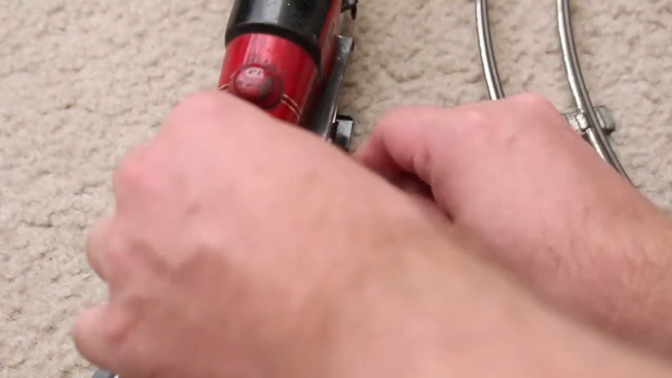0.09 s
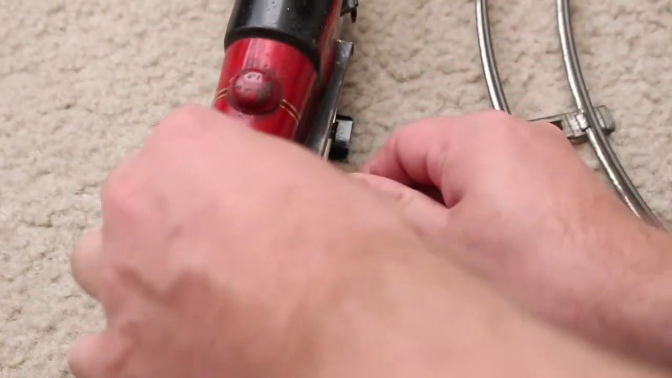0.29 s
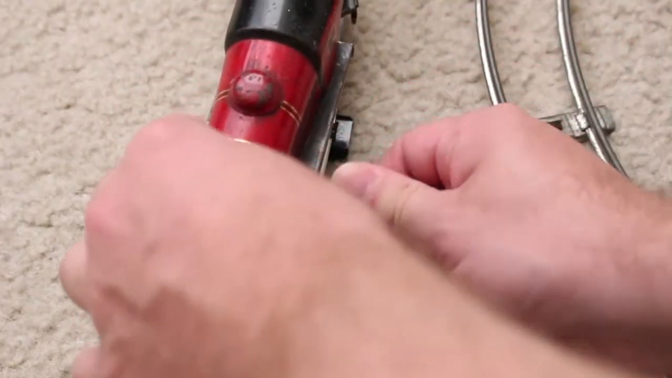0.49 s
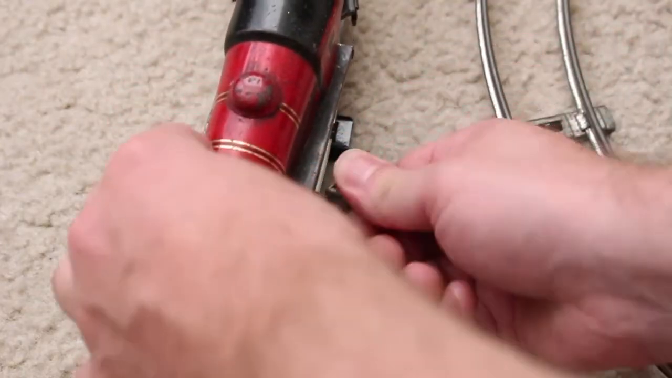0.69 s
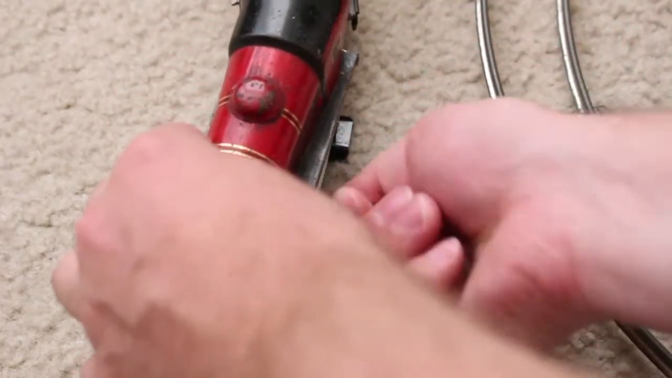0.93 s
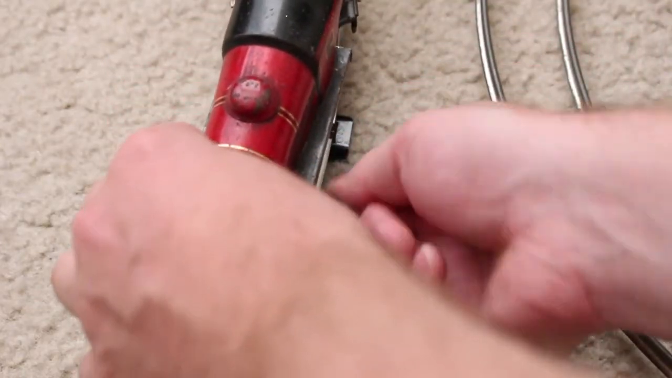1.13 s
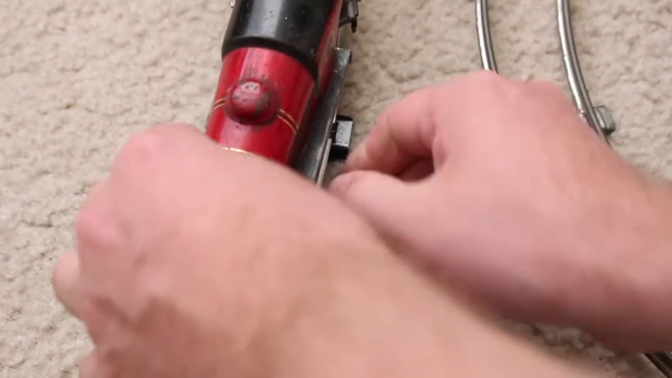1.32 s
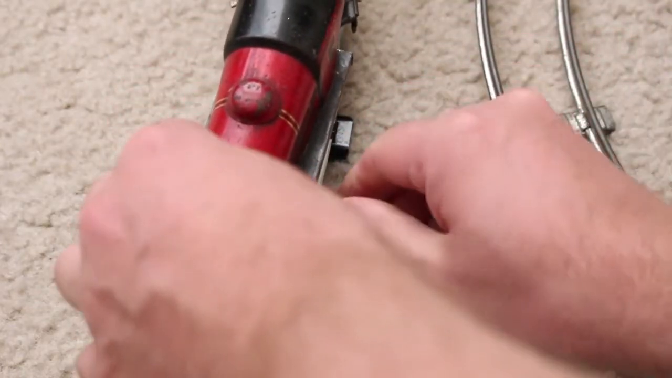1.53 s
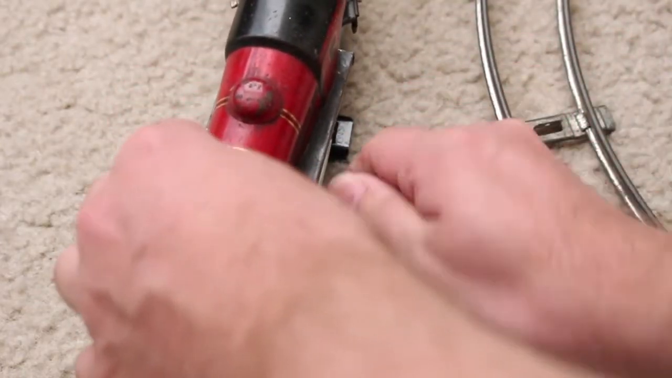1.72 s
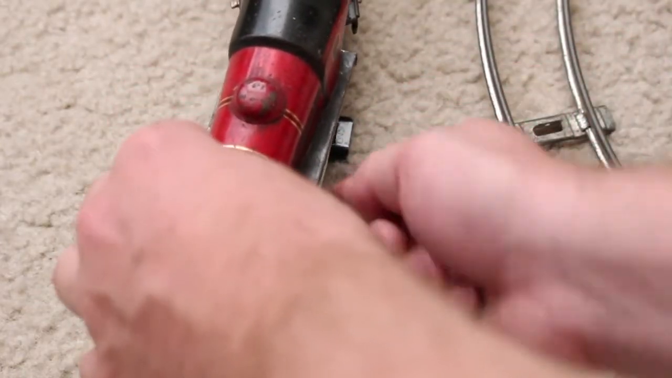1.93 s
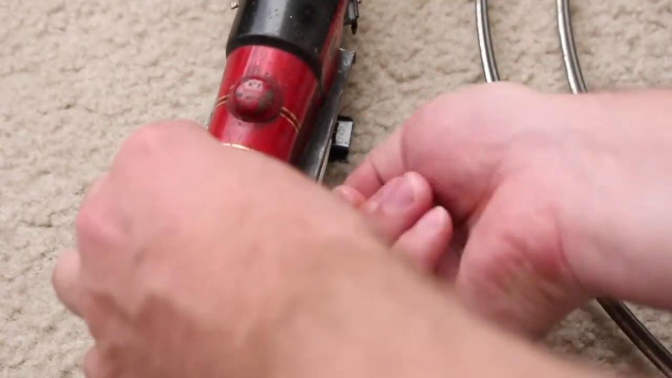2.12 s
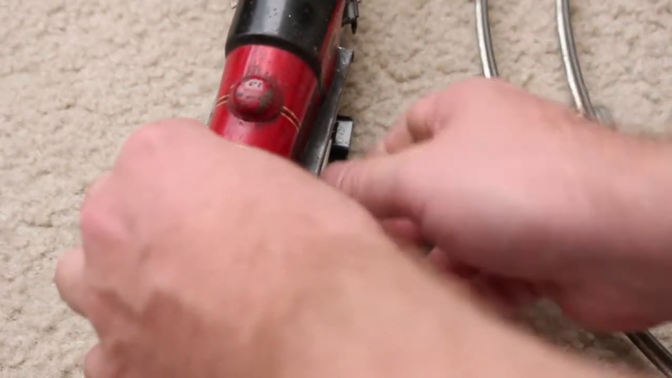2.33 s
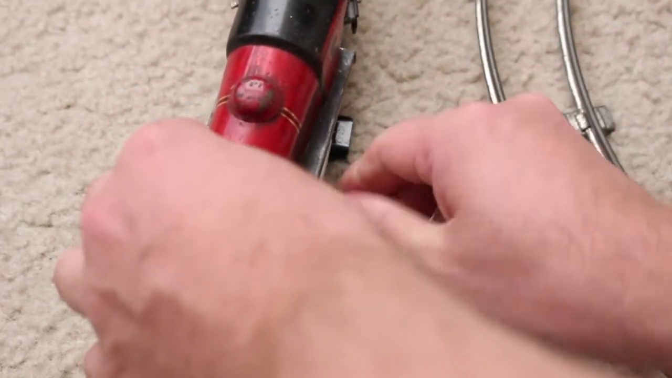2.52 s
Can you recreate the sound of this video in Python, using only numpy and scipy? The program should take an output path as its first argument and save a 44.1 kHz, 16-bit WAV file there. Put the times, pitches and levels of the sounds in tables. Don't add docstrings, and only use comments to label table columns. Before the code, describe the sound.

A clockwork toy locomotive is wound by key, its ratchet snapping in two uneven metallic bursts

```python
import sys
import numpy as np
from scipy import signal
from scipy.fft import rfft, irfft
from scipy.io import wavfile

SR = 44100
rng = np.random.default_rng(int(sys.argv[2]) if len(sys.argv) > 2 else 0)


def wav_record(signal):
    frames = np.transpose(np.atleast_2d(signal))
    bounded = np.clip(frames, -1, 1)
    quanta = np.round(bounded * 32767).astype(np.int16)
    wavfile.write(sys.argv[1], SR, quanta)


def voltage_ratio(level):
    return 10 ** (np.asarray(level, float) / 20)


N = 112455

# (time [s], peak level [dB], gear brightness [dB], strongest ring [Hz], second ring [Hz])
PAWL_SNAPS = [(0.2109, -13.5, -1, 1580, 2130), (0.5954, -14.5, -0.5, 2235, 1350),
              (0.7847, -21.5, 0.5, 2145, 3615), (0.9137, -17, -2.5, 1560, 1594),
              (0.987, -23.5, 1.5, 2090, 1520), (1.464, -33.5, -2.5, 920, 1490),
              (1.829, -18.5, -1.5, 2145, 1645), (1.9181, -22, -2.2, 1382, 1256),
              (1.998, -33, -6, 2145, 1860), (2.006, -19.5, -1, 2070, 1290), (2.092, -16, -6.5, 1557, 1787)]
SNAP_SIZZLE_DB = [1.5, 0.8, -1.5, 0.1, 1.7, 2.5, -2.7, 2.7, -20, -2, 7]
# (time [s], peak level [dB], gear brightness [dB], strongest ring [Hz], second ring [Hz])
KEY_KNOCKS = [(0.001, -34, -6, 2110, 3080), (0.017, -39, -7, 1380, 2060), (0.0515, -35, -12, 2210, 3130),
              (1.015, -27, -9, 1650, 1360), (1.024, -35, -0.5, 2110, 1700), (1.107, -32.5, 0.5, 1480, 6280),
              (1.1511, -28.5, -4, 2246, 1680), (1.4229, -34, -14, 1750, 1300),
              (1.6888, -31, -4.5, 2150, 1620), (1.7162, -31.5, 1, 2220, 1660),
              (1.7732, -35.5, -5.5, 2160, 1750), (2.2242, -42, 2, 1850, 1490),
              (2.2293, -32, -1, 1580, 1760), (2.2695, -25.5, -3.5, 1590, 7880),
              (2.285, -27, -5, 1577, 2170), (2.303, -34.5, -5, 2550, 1580),
              (2.5025, -46.5, 1.5, 1300, 2100), (2.5075, -33.5, -2.5, 1300, 1850)]
# (time [s], peak level [dB], gear brightness [dB],
# strongest ring [Hz], second ring [Hz])
TAPS_AND_REBOUNDS = [(0.1478, -38.5, -1, 365, 1300), (0.2123, -12, 2.5, 2020, 1505), (0.218, -15, -6, 1546, 1690),
                     (0.5921, -20, -2, 1360, 1660), (0.5965, -19, -1, 2282, 1964), (0.6612, -29.5, 2, 1520, 1650),
                     (0.6672, -35, -8.5, 1640, 1710), (0.7849, -21, 2, 3640, 3454),
                     (0.8132, -35.5, -6.5, 3580, 2440), (0.8879, -42, -9.5, 1545, 1400),
                     (0.9122, -24, -9.5, 1650, 1260), (0.9472, -36, -6.5, 1585, 1700),
                     (0.9772, -29.5, -6.5, 2230, 1460), (1.1024, -40, 8, 1710, 2780), (1.1235, -35, 0, 1735, 2100),
                     (1.1531, -34.5, 1, 2110, 2900), (1.2456, -40, -5, 1260, 1600), (1.3152, -45, -12, 905, 1610),
                     (1.4272, -40, -12.5, 525, 905), (1.4342, -41, -9.5, 1610, 905), (1.4647, -35, -4, 884, 517),
                     (1.4716, -40, -6, 760, 2470), (1.4782, -39, 6, 5800, 2490), (1.7123, -39, 2.5, 2130, 2500),
                     (1.7744, -41, 1, 2160, 3010), (1.8362, -26.5, -1, 1655, 2190),
                     (1.9252, -34, -3.5, 1610, 1740), (2.0946, -20.5, 5, 1420, 1630), (2.1006, -27, 9, 1565, 1740),
                     (2.171, -34, 4, 1740, 1320), (2.1782, -35, -14, 1680, 1575), (2.2129, -35, 0, 1690, 2200),
                     (2.373, -43, -7.5, 1550, 1840), (2.384, -39, -17, 1700, 1480)]
# (start [s], length [s], level [dB])
KEY_RUBS = [(0.015, 0.056, -75.5), (0.187, 0.03, -62.5), (0.584, 0.0085, -61), (0.695, 0.08, -71.5),
            (0.875, 0.029, -74), (0.939, 0.085, -65.5), (1.064, 0.11, -71), (1.239, 0.09, -72),
            (1.707, 0.055, -75.5), (2.12, 0.053, -78), (2.262, 0.095, -73.5)]
# (frequency [Hz], level [dB], T60 [s])
SHELL_MODES = [(1160, -38, 0.09), (1235, -7, 0.021), (1320, -14.5, 0.072), (1386, -13, 0.045),
               (1490, -23.5, 0.045), (1589, -13.5, 0.05), (1634, -18, 0.15), (1707, -8.5, 0.051),
               (1850, -8.5, 0.03), (2070, 2, 0.0069), (2145, -17, 0.11), (2215, 3, 0.035),
               (2465, -6.5, 0.042), (2685, -11.5, 0.022)]
# (frequency [Hz], level [dB], T60 [s])
HOLLOW_MODES = [(343, -42, 0.0048), (462, -18, 0.025), (640.4, -13, 0.025), (907, -15, 0.017),
                (1070, -16.5, 0.015)]
# (frequency [Hz], level [dB], T60 [s])
GEAR_MODES = [(3000, -4, 0.021), (3267, 1.5, 0.0091), (3400, -10, .04), (3615, -6, 0.056),
              (4200, -19, 0.033), (4920, -21, 0.013), (5070, -16, 0.09), (5310, -9, 0.09),
              (6280, -19, 0.026), (7760, -5.5, 0.03), (7440, -30.5, 0.028), (8300, -9, 0.0057),
              (9160, -38, 0.01), (11000, -36, 0.015)]
# (frequency [Hz], level [dB], T60 [s])
DOME_MODES = [(1520, -21.5, 0.3), (1560, -16.5, 0.3), (1592, -21, 0.3), (1690, -21, 0.19)]
# (frequency [Hz], density [dB per Hz])
RATTLE_SPECTRUM = [(1500, -7), (2600, -6), (4000, 1.5), (6000, 1.5), (8000, 2), (9500, -2.5), (16000, -13)]
# (frequency [Hz], density [dB per Hz])
SIZZLE_SPECTRUM = [(7000, -20), (9000, -1), (12000, -0.5), (14500, -4), (16000, -16)]
# (time [s], length [s], level [dB], frequency [Hz])
HAND_PRESSES = [
    (0.71, 0.061, -62, 71),
    (1.12, 0.097, -66, 66),
    (1.795, 0.13, -58, 82.4),
    (2.256, 0.11, -67, 72.3),
]
# (frequency [Hz], density [dB per Hz])
HUSH_SPECTRUM = [(20, -0.5), (70, 7.5), (110, 5.5), (190, 4.5), (600, 1), (2000, -2), (9000, -11),
                 (16500, -18.5)]
# (frequency [Hz], width [Hz], level [dB])
HUMS = [
    (86.2, 9, -76.5),
    (189, 42, -69),
]
# (frequency [Hz], left-right likeness [-1..1])
HUSH_LIKENESS = [(60, -0.28), (130, -0.46), (290, 0.068), (640, -0.27), (1410, -0.18), (3100, -0.25),
                 (6820, 0.15), (15000, -0.33)]

FAVOUR_OCTAVES = 0.07


def rms_one(x):
    return x / np.sqrt(np.mean(x ** 2) + 1e-20)


def shaped(x, points):
    hz, db = np.transpose(points)
    f = np.maximum(np.arange(N // 2 + 1) * SR / N, 1)
    return irfft(rfft(x) * voltage_ratio(np.interp(np.log(f), np.log(hz), db)), N)


def pan(db):
    return voltage_ratio(db * np.array([[-.5], [.5]]))


def toy_highpass(x, order):
    return signal.sosfilt(signal.butter(order, 405, "high", fs=SR, output="sos"), x)


def nearness(hz, centre_hz, octaves):
    return np.exp(-(np.log2(hz / centre_hz) / octaves) ** 2)


def energy_envelope(kicks, t60):
    return np.sqrt(signal.lfilter([1], [1, -voltage_ratio(-120 / (t60 * SR))], kicks + 1e-18))


def contacts():
    rows = np.array([*PAWL_SNAPS, *KEY_KNOCKS, *TAPS_AND_REBOUNDS])
    counts = [len(PAWL_SNAPS), len(KEY_KNOCKS), len(TAPS_AND_REBOUNDS)]
    kind = np.repeat(np.arange(3), counts)[:, None]
    loss_db = np.array([4.5, 3, 37])[kind]
    sizzle_db = np.r_[SNAP_SIZZLE_DB, np.full(counts[1] + counts[2], -29)][:, None]
    jitter = rng.uniform(-.3, .3, (len(rows), 6))
    step = np.arange(-1, 5)
    bounce_s, tick_lead_s, tick_db = 0.004, 0.0015, -15
    bouncing = step > 0
    s = rows[:, :1] + np.where(step < 0, -tick_lead_s, bounce_s * (step + jitter * bouncing))
    tick = tick_db - loss_db * (kind > 0)
    landing = -loss_db * step + 6 * jitter * bouncing
    db = rows[:, 1:2] - 10 * (kind == 2) + np.where(step < 0, tick, landing)
    at = (np.maximum(s, 0) * SR).astype(int)
    return at, step, db, rows[:, 2:3], sizzle_db, rows[:, 3:4], rows[:, 4:5]


def ring(clicks, hz, t60):
    r, w = voltage_ratio(-60 / (t60 * SR)), 2 * np.pi * hz / SR
    return signal.lfilter([0, np.sin(w)], [1, -2 * r * np.cos(w), r * r], clicks + 1e-18)


def body(modes, at, db, first_hz, second_hz, rub, longest_s=0.06, rattle_db=-17):
    out = np.zeros(N)
    for hz, level_db, t60 in modes:
        first, second = nearness(hz, first_hz, FAVOUR_OCTAVES), nearness(hz, second_hz, FAVOUR_OCTAVES)
        colour_db = level_db * np.clip(1 - first - second, 0, 1) - 8 * first - 11 * second
        colour_db = colour_db + rng.normal(0, 2, at.shape)
        clicks = np.zeros(N)
        np.add.at(clicks, at, voltage_ratio(db - 17 + colour_db) * rng.choice([-1, 1], at.shape))
        shake = energy_envelope(clicks ** 2, 0.24)
        grains = rng.standard_normal(N) * (rng.random(N) < 400 / SR)
        stroke = rub * voltage_ratio(level_db + 12 * nearness(hz, 1680, 0.15))
        out += ring(clicks + voltage_ratio(rattle_db) * shake * grains + stroke, hz, min(t60, longest_s))
    return toy_highpass(out, 3)


def clacks():
    rise_s = 0.0011
    t = np.arange(4000) / SR
    out = np.zeros(N + len(t))
    for rows, t60 in ((PAWL_SNAPS, .022), (KEY_KNOCKS, .017), (TAPS_AND_REBOUNDS, .022)):
        for s, db, _, first_hz, second_hz in rows:
            pair = np.sin(2 * np.pi * first_hz * t) + voltage_ratio(-2) * np.sin(2 * np.pi * second_hz * t)
            envelope = voltage_ratio(db - 6.5 - 60 * t / t60) * (1 - np.exp(-(t / rise_s) ** 2))
            i = max(int((s - rise_s / 2) * SR), 0)
            out[i:i + len(t)] += envelope * pair
    return out[:N]


def fine_rattle(at, db, spectrum, t60):
    kicks = np.zeros(N)
    np.add.at(kicks, at, voltage_ratio(2 * db))
    grain = rng.standard_normal((2, N)) * voltage_ratio(4.5 * rng.standard_normal((2, N)))
    impulse = np.eye(1, N)[0]
    kernel = np.roll(shaped(impulse, spectrum), 40)[:81] * np.hanning(81)
    kernel = kernel[None] / np.linalg.norm(kernel)
    mid, side = signal.fftconvolve(energy_envelope(kicks, t60) * rms_one(grain), kernel, "same", axes=1)
    return toy_highpass(mid + voltage_ratio(-3.5) * side * [[1], [-1]], 2)


def rubbing():
    t, stroke = np.arange(N) / SR, np.zeros(N)
    for s, length, db in KEY_RUBS:
        stroke += voltage_ratio(db) * np.sin(np.pi * np.clip((t - s) / length, 0, 1)) ** .5
    return stroke * rng.standard_normal(N) * (rng.random(N) < 2500 / SR)


def locomotive():
    at, step, db, bright_db, sizzle_db, first_hz, second_hz = contacts()
    rub = rubbing()
    high_db = db + bright_db + np.where(step < 0, -15.0, 0)
    dome_db = db + 5 * nearness(first_hz, 1570, FAVOUR_OCTAVES)
    rings = body([*SHELL_MODES, *HOLLOW_MODES], at, db, first_hz, second_hz, rub)
    rings += body(GEAR_MODES, at, high_db, first_hz, second_hz, 0.4 * rub, 0.016, -26)
    rings += body(DOME_MODES, at, dome_db, 1, 1, 0, 0.25, -16)
    rings += clacks()
    side = voltage_ratio(-13.5) * np.roll(rings, int(SR / 5000)) * [[1], [-1]]
    toy = rings + side
    toy = toy + fine_rattle(at, high_db - 15.5, RATTLE_SPECTRUM, 0.04)
    return toy + fine_rattle(at, high_db + sizzle_db - 14.5, SIZZLE_SPECTRUM, 0.018)


def room(x):
    split_hz, top_hz, high_t60, top_t60 = 1640, 7900, 0.29, 0.15
    t = np.arange(SR // 2) / SR
    a, b = rng.standard_normal((2, len(t)))
    onset = np.clip(t / 0.0029 - 1, 0, 1)
    tail = 0
    for kind, alike, t60, db in (("low", 0.13, 0.27, 0), ("high", 0.11, high_t60, 1.46)):
        pair = np.sqrt(1 + alike) * a + np.sqrt(1 - alike) * b * [[1], [-1]]
        part = signal.lfilter(*signal.butter(2, split_hz, kind, fs=SR), pair)
        tail = tail + part * voltage_ratio(db - 60 * t / t60) * onset / np.sqrt(t60 * SR / 7)
    below = signal.lfilter(*signal.butter(2, top_hz, fs=SR), tail)
    above = signal.lfilter(*signal.butter(2, top_hz, "high", fs=SR), tail)
    tail = below - above * voltage_ratio(-1.5 - 60 * t * (1 / top_t60 - 1 / high_t60))
    return voltage_ratio(-2) * signal.fftconvolve(x[None], tail, axes=1)[:, :N]


def presses():
    t, out = np.arange(N) / SR, np.zeros(N)
    for s, length, db, hz in HAND_PRESSES:
        swell = np.sin(np.pi * np.clip((t - s) / length, 0, 1)) ** 2
        out += voltage_ratio(db) * swell * np.sin(2 * np.pi * hz * (t - s))
    return out * np.array([[.4], [1.6]])


def hush():
    a, b = rng.standard_normal((2, N))
    hz, alike = np.transpose(HUSH_LIKENESS)
    mid = shaped(shaped(a, HUSH_SPECTRUM), np.c_[hz, 10 * np.log10(1 + alike)])
    side = shaped(shaped(b, HUSH_SPECTRUM), np.c_[hz, 10 * np.log10(1 - alike)])
    out = voltage_ratio(-64.5) * (mid + side * [[1], [-1]]) / mid.std()
    for hum_hz, width, db in HUMS:
        peak = signal.iirpeak(hum_hz, hum_hz / width, fs=SR)
        lump = signal.lfilter(*peak, rng.standard_normal((2, N)))
        out += voltage_ratio(db) * rms_one(lump + 1.9 * lump[0]) * pan(6.5)
    return out * pan(1.76)


def scene():
    toy = locomotive()
    return pan(1) * (toy + room(toy.mean(axis=0))) + presses() + hush()


def top_cut(x):
    return signal.sosfilt(signal.butter(12, 16810, fs=SR, output="sos"), x)


def record(dry):
    lowpass = signal.cheby2(12, 60, 16750, fs=SR, output="sos")
    return top_cut(signal.sosfilt(lowpass, dry))


dry = scene()
out = record(dry)
wav_record(out)
```